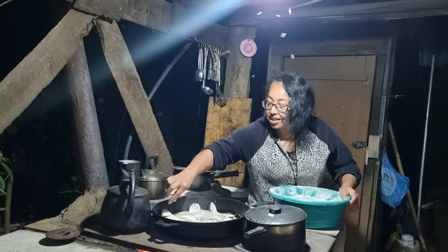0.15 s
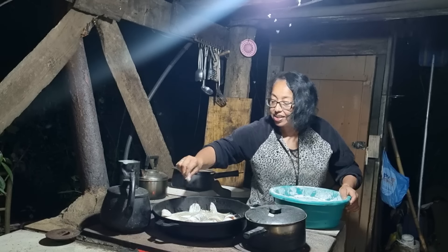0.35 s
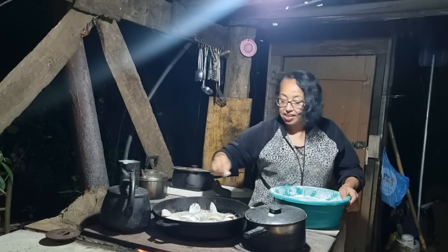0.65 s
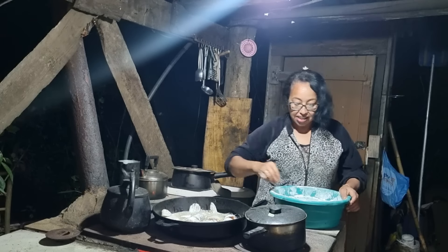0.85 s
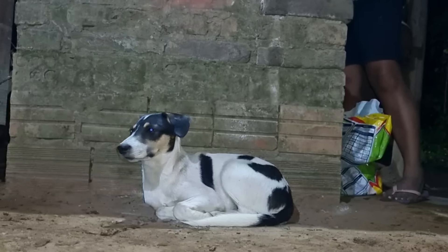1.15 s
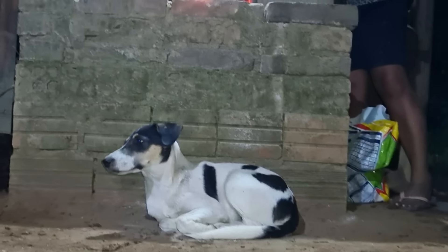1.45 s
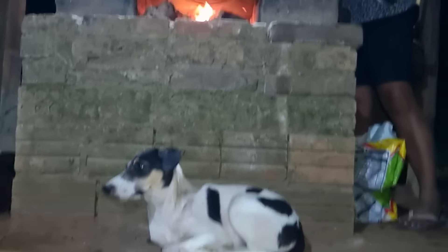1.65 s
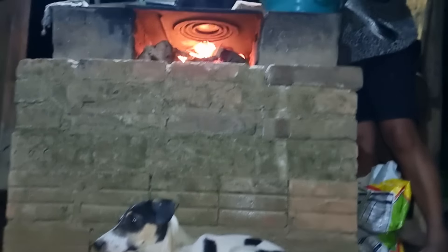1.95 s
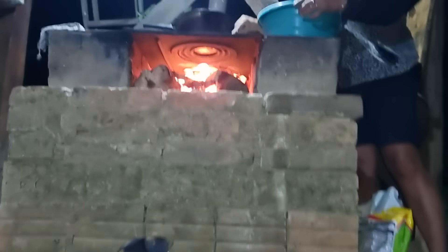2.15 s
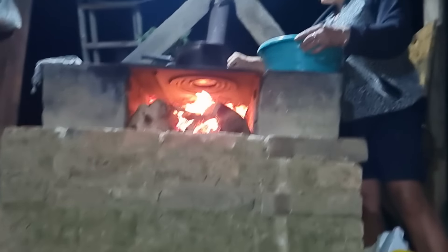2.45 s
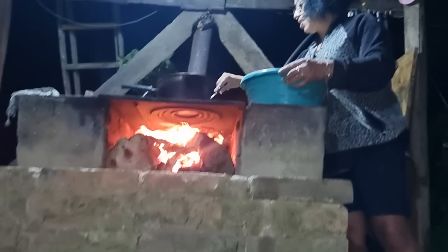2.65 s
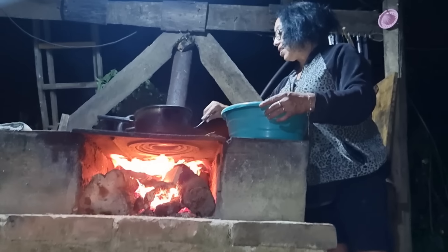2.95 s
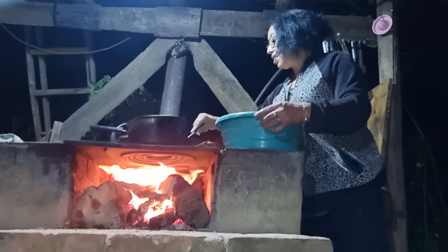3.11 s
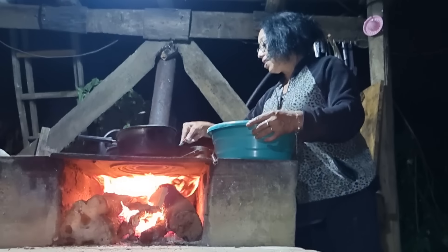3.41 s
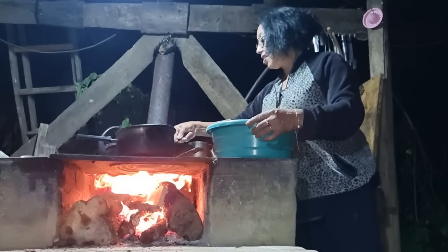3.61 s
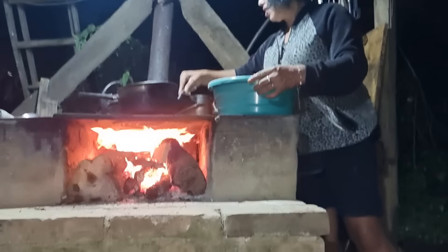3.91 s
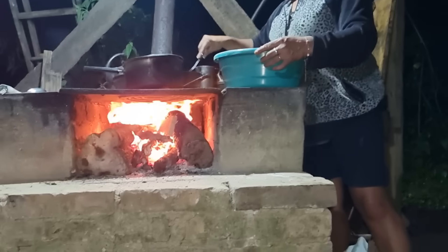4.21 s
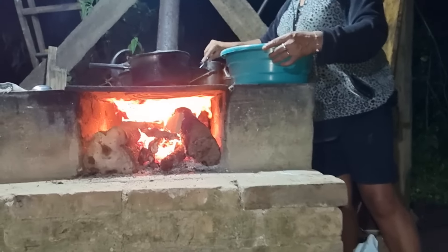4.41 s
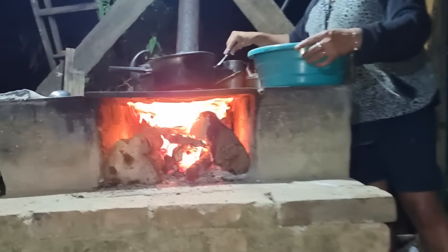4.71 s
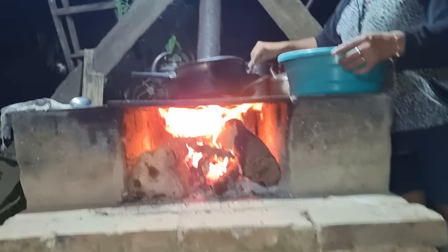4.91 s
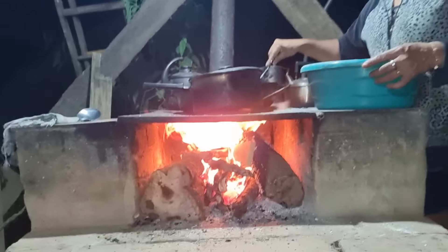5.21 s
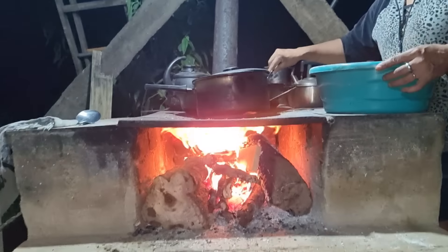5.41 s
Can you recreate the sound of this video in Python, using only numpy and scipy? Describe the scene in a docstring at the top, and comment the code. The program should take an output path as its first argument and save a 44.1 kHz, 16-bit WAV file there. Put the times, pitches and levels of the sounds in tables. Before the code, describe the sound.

A dense, high cricket chorus runs throughout this five and a half second night scene, heard through a hand-held stereo microphone in an open-air kitchen. At first a generator hums close by. At about 1 second, hum and crickets abruptly become quieter and continue that way. Frogs make short, dry clicks all along, the loudest just before 1 second. A wood fire ticks lightly, with clearer snaps around 1.3 and 3.4 seconds and a loud double pop at 5.2. The stove gives soft, dull thuds near 0.2, 1, 1.8 and 5.1 seconds. From 1.7 to 5 seconds, fingers tap and rub the microphone on the right, with the sharpest knocks at 2.7, 2.9 and 3.3. A lower cricket trills briefly around 4 seconds, then close crickets chirp on the right from 4.4. Underneath lie a low drone, distant insects and a faint river that swells slightly at the end.

```python
"""A chorus of crickets at night, each wing stroke a short high tone, heard from an open kitchen. Frogs click in
pulses through their throats, a generator hums, and a wood fire snaps in a stove that gives dull thuds. Behind
them lie a low drone and the night air: far insects, a river, rumble. For the first second the scene is near the
generator; then it changes to one by the stove, where fingers tap and rub the right microphone port of the hand-
held stereo recorder."""
import sys
import numpy as np
from scipy import signal
from scipy.fft import rfft, irfft, next_fast_len
from scipy.io import wavfile
from scipy.ndimage import uniform_filter1d

SR = 44100
rng = np.random.default_rng(int(sys.argv[2]) if len(sys.argv) > 2 else 0)


def unload_wav(signal):
    """Save mono or channel-first audio to the path in sys.argv[1] as 16-bit WAV at rate SR, clipped to [-1, 1]."""
    wavfile.write(
        sys.argv[1],
        SR,
        np.round(np.clip(np.atleast_2d(signal).T, -1, 1) * 32767).astype(np.int16),
    )


N = 245219
CHANGE_S, CHANGE_FADE_S = 0.97, 0.006  # the scene changes from the generator to the stove
STROKE_S, NEAR_CRICKETS_PAN_DB = .0049, -6  # pan is always left minus right

# Colour of the cricket chorus. Each row: frequency in Hz, gain in dB.
CHORUS_COLOUR = [(3900, -27), (4300, -17), (4600, -8), (4950, 1), (5250, -2), (5500, -4.5), (5850, -4.5),
                 (6050, -12), (6220, -27), (6600, -54)]
# The chorus from the stove, as the recorder swings. Each row: time in seconds, level in dB, pan in dB.
CHORUS_BY_STOVE = [(1.0, -44, -8), (2.2, -46, -1.5), (3.56, -45.5, -1), (3.7, -43.5, -3), (5.56, -41.5, -6)]
# Loud wing strokes of crickets close by, mostly in pairs. Each row: start in seconds, level in dB.
NEAR_STROKES = [(0.3566, -22.5), (3.4017, -31), (4.4308, -30.5), (4.5885, -29), (4.6458, -30),
                (4.7562, -26.5), (4.8075, -29), (4.9187, -29.5), (4.9841, -25), (5.0345, -30.5),
                (5.1417, -28), (5.1921, -28)]
# Frogs close to the microphone. Each row: start in seconds, level in dB, throat resonance in Hz.
NEAR_FROGS = [(0.819, -38, 3170), (0.94, -27.5, 3120), (1.172, -38, 2970), (1.4868, -40, 2960),
              (2.1952, -38, 3100), (2.515, -34.5, 2450), (2.7206, -34, 2650), (3.1188, -35.5, 2740),
              (3.3774, -39.5, 2800), (3.3974, -38, 2760), (3.7462, -37.5, 2400), (4.002, -41, 2370),
              (4.2275, -41, 3170), (4.6726, -37, 3120), (4.878, -35, 2950), (4.926, -40, 3220)]
# The generator's fundamental from the stove. Each row: time in seconds, level in dB.
HUM_BY_STOVE = [(1, -52), (2.4, -50), (3, -47), (3.6, -47), (4.2, -49), (5.3, -46)]
# Its overtones. Each row: multiple of the fundamental, level in dB close up, level in dB by the stove.
HUM_OVERTONES = [(2, -51, -64.5), (3, -66, -66), (6, -59, -78), (7, -54.5, -75.5), (8, -64.5, -75.5),
                 (9, -64.5, -85), (14, -62, -90)]
# Loudest snaps of the fire. Each row: start in seconds, level in dB, pan in dB.
FIRE_SNAPS = [(1.285, -36, 4), (1.9909, -41, 6), (3.4062, -32.5, 10), (3.4123, -36, 8), (4.4223, -40, 5),
              (4.4443, -40, 7), (5.1786, -38, -9), (5.2288, -22.5, 0), (5.2649, -28, 3)]
# Colour of a snap. Each row: frequency in Hz, gain in dB.
SNAP_COLOUR = [(1500, -38), (2500, -17), (5000, 4), (7500, -4), (11000, -5.5), (15600, 0)]
# Thuds from the stove. Each row: start in seconds, level in dB, pitch in Hz.
STOVE_THUDS = [(0.204, -32, 302), (0.925, -28.5, 170), (1.023, -34, 173), (1.844, -34.5, 160),
               (5.132, -38, 171)]
# Taps on the right port. Each row: time in seconds, level in dB, contact in ms, direction as +1 or -1.
FINGER_TAPS = [(1.805, -26, 3.1, 1), (2.127, -24.5, 1.8, 1), (2.1498, -16, 1.86, 1), (2.261, -28.5, 3.8, 1),
               (2.31, -33.5, 2.4, 1), (2.357, -24.5, 3, 1), (2.7094, -6, 0.53, -1), (2.7332, -13, 0.85, 1),
               (2.868, -27.5, 5.8, -1), (2.948, -13.5, 0.48, 1), (3.318, -15, 0.8, 1),
               (3.552, -30, 0.88, 1), (4.986, -21, 11.6, 1)]
# Ring of the recorder's case. Each row: pitch in Hz, dB relative to the tap, seconds to fall 60 dB.
CASE_MODES = [(115, -9, .045), (200, -14, .03)]
# Rubs on the right port. Each row: start in seconds, length in seconds, level in dB.
FINGER_RUBS = [(1.71, .03, -31), (2.115, 0.056, -36.5), (2.2, 0.43, -46), (2.703, 0.047, -30),
               (2.819, 0.31, -44), (2.975, 0.036, -39), (3.318, 0.029, -39.5), (3.452, .25, -44.5),
               (3.654, .13, -41), (4.401, 0.082, -45), (4.485, 0.059, -33.5), (4.633, 0.029, -35.5),
               (4.935, 0.055, -36)]
# Swell of the low drone. Each row: time in seconds, level in dB.
DRONE_LEVEL = [(0, -56), (1, -53.5), (1.95, -54.5), (3.1, -63), (4.6, -58), (5.1, -53.5), (5.56, -52.5)]
# Night air by the stove. Each row: frequency in Hz, left level in dB per Hz, right minus left in dB,
# extra dB near the generator.
NIGHT_AIR = [(30, -91, 5, 2), (60.4, -71, 4.5, -5), (101, -75, 1, 13), (170, -84, -2, 3.5),
             (300, -88, 1, 4), (460, -96, 3.5, 12.5), (620, -99, 6.5, 10.5), (750, -105, 6.5, 15.5),
             (950, -98.5, 6.5, 11), (1630, -94.5, 3.5, 7.5), (2300, -85.5, 0, 5.5), (4040, -87.5, 2, 9.5),
             (6470, -94, -0.5, 11), (7170, -91.5, 1, 9), (8040, -87, 4, 7), (8730, -92, 6, 8),
             (9430, -100, 3, 11.5), (11300, -105, -2, 13.5), (15300, -106, 1, 11.5)]
# How alike the air is at the two microphones. Each row: frequency in Hz, likeness from 0 to 1.
AIR_LIKENESS = [(60, 1), (450, 0.79), (1200, 0.12), (3000, 0.014)]
# Swell of the river from the stove. Each row: time in seconds, gain in dB around 800 Hz.
RIVER_SWELL = [(1, -6), (1.5, -3), (1.9, 1.5), (4.2, 1), (5.3, 2), (5.56, 6.5)]
# Treble dip of the right microphone port. Each row: frequency in Hz, gain in dB.
RIGHT_PORT_DIP = [(6200, 0), (7000, -6), (7500, -13), (8000, -26), (8600, -33), (9300, -24), (10000, -15),
                  (12000, -8), (15500, -8)]
# Cut of the lowest bass. Each row: frequency in Hz, gain in dB.
BASS_CUT = [(15, -9), (30, -5), (42, 0)]


def cricket_chorus(strokes_per_s=60, spread_db=2.5, blur=.55, patchy_db=1.46):
    """Crickets all around, each at its own pitch, over the blur of far ones; groups swell and fade."""
    near = np.zeros((2, N))
    for hz in np.linspace(4200, 6300, 24):
        onsets = rng.random((2, N)) < strokes_per_s / SR
        strength = gain_of(spread_db * np.minimum(rng.exponential(1, (2, N)), 3.5))
        near += signal.oaconvolve(onsets * strength, wing_stroke(hz, STROKE_S)[None], axes=1)[:, :N]
    far = coloured(rng.standard_normal((2, N)), [(3800, -30), (3900, 0), (6500, 0), (6700, -30)])
    song = coloured((1 - blur) * unit_rms(near) + blur * unit_rms(far), CHORUS_COLOUR)
    spectrum = signal.stft(song, SR, nperseg=256)[2]
    spectrum *= gain_of(patchy_db * patches(spectrum.shape[1:], bins=4, frames=22))
    song = unit_rms(signal.istft(spectrum, SR, nperseg=256)[1][:, :N])
    t = np.arange(N) / SR
    db = by_place(t, at_generator=-34.5, at_stove=at_time(CHORUS_BY_STOVE, t))
    pan_db = by_place(t, at_generator=-3.2, at_stove=at_time(CHORUS_BY_STOVE, t, column=2))
    return np.sqrt(2) * gain_of(db) * panned(song, pan_db)


def wing_stroke(hz, length_s, sag=0.038):
    """One stroke of a cricket's wing: a short tone whose pitch sags a little."""
    t = np.arange(0, length_s, 1 / SR)
    pitch_hz = hz * (1 + sag * (.5 - t / length_s))
    return np.sin(np.pi * t / length_s) * np.sin(2 * np.pi * np.cumsum(pitch_hz) / SR)


def near_crickets(hz=4920):
    """Loud wing strokes of crickets close by on the right, standing out of the chorus."""
    out = np.zeros(N)
    for start, db in NEAR_STROKES:
        add(out, start, gain_of(db) * wing_stroke(hz, STROKE_S))
    return panned(out, NEAR_CRICKETS_PAN_DB)


def cricket_trill(start=3.82, length_s=.5, hz=4480, strokes_per_s=75, db=-47, jitter=.3, spread_db=1.5):
    """A lower cricket joins for a moment: a run of uneven wing strokes that swells and fades."""
    out = np.zeros(N)
    offsets = np.arange(0, length_s, 1 / strokes_per_s)
    for offset, swell in zip(offsets, signal.windows.tukey(len(offsets), .4)):
        late, loud = rng.standard_normal(2)
        stroke = swell * gain_of(db + spread_db * loud) * wing_stroke(hz, 2 * STROKE_S)
        add(out, start + offset + jitter * late / strokes_per_s, stroke)
    return panned(out, NEAR_CRICKETS_PAN_DB)


def frog_click(hz, decay_s, half_band_hz=350, pulses_per_s=350, click_db=-9):
    """A burst of uneven pulses through a throat resonance, with a wider click on top."""
    t = np.arange(4400) / SR
    pulses = rng.standard_normal((2, len(t))) * (0.35 + np.cos(np.pi * pulses_per_s * t) ** 2)
    pulses[1] = 0.47 * pulses[0] + 1.1 * pulses[1]  # partly alike at the two microphones
    envelope = (1 - np.exp(-t / 0.00094)) * (np.exp(-t / decay_s) + 0.14 * np.exp(-t / 0.025))
    burst = pulses * envelope
    throat = signal.butter(2, [hz - half_band_hz, hz + half_band_hz], "band", fs=SR, output="sos")
    wide = signal.butter(2, [2000, 4600], "band", fs=SR, output="sos")
    return 2.3 * (signal.sosfilt(throat, burst) + gain_of(click_db) * signal.sosfilt(wide, burst))


def frogs(far_db=-51, spread_db=6.5):
    """Near frogs click straight ahead, far ones at random from either side."""
    out = np.zeros((2, N))
    for start, db, hz in NEAR_FROGS:
        add(out, start, panned(gain_of(db) * frog_click(hz, decay_s=0.013), pan_db=-0.5))
    for when, pitch, loud, side in rng.random(size=(55, 4)):
        call = gain_of(far_db + spread_db * loud) * frog_click(2300 + 900 * pitch, decay_s=0.012)
        add(out, when * N / SR, panned(call, pan_db=6 * (side - .5)))
    return out


def generator(hz=58.5, close_db=-41, right_lag_rad=0.64, waver_db=1.5):
    """A hum with overtones, close up and then farther off; the fundamental wavers apart on each side."""
    t = np.arange(N) / SR
    phase = 2 * np.pi * hz * t - np.array([[0], [right_lag_rad]])
    waver = unit_rms(uniform_filter1d(uniform_filter1d(rng.standard_normal((2, N)), 2500), 2500))
    tone = gain_of(by_place(t, close_db, at_time(HUM_BY_STOVE, t)) + waver_db * waver) * np.sin(phase)
    for multiple, near_db, far_db in HUM_OVERTONES:
        overtone = np.sin(round(multiple) * phase + 2 * np.pi * rng.random())
        tone += gain_of(by_place(t, near_db, far_db)) * overtone
    return panned(np.sqrt(2) * tone, pan_db=-2.0)


def wood_fire(small_db=-64, tail_db=-20):
    """Burning wood snaps: a click, a 1 ms burst and a faint tail; small snaps come at random."""
    t, out = np.arange(1800) / SR, np.zeros((2, N))
    click = 2.5 * (t == 0)
    decay = np.exp(-t / 0.00083) + gain_of(tail_db) * np.exp(-t / 0.014)
    envelope = np.minimum(t / 0.00021, 1) * decay
    small = [(when * N / SR, small_db + 12 * loud, 0) for when, loud in rng.random(size=(100, 2))]
    for start, db, pan_db in list(FIRE_SNAPS) + small:
        snap = click + rng.standard_normal(len(t)) * envelope
        add(out, start, panned(gain_of(db) * snap, pan_db))
    return coloured(out, SNAP_COLOUR)


def stove_thuds(t60=0.058):
    """Low, soft knocks from the stove that reach both microphones."""
    t, out = np.arange(0, .15, 1 / SR), np.zeros(N)
    attack = 1 - np.exp(-t / 0.0018)
    for start, db, hz in STOVE_THUDS:
        add(out, start, attack * gain_of(db - 60 * t / t60) * np.sin(2 * np.pi * hz * t))
    return panned(out, pan_db=-1.4)


def finger_taps(rise=0.44, fall=0.26, crack_hz=2800, crack_s=.00015):
    """A finger pushes the port, which springs back and rings the case; short, hard taps crack."""
    t, out = np.arange(-700, 5000) / SR, np.zeros(N)  # the push peaks at t = 0
    modes = sum(np.sin(2 * np.pi * hz * t + 0.24) * gain_of(db - 60 * t / t60)
                for hz, db, t60 in CASE_MODES)
    for when, db, contact_ms, direction in FINGER_TAPS:
        width_ms = contact_ms * np.where(t < 0, rise, fall)
        push = np.exp(-abs(1000 * t / width_ms) ** 1.7)
        ring = (t > 0) * (1 - push) * modes
        crack = .07 / contact_ms * np.sin(2 * np.pi * crack_hz * t) * np.exp(-(t / crack_s) ** 2)
        add(out, when + t[0], np.sign(direction) * gain_of(db) * (push - ring + crack))
    return out


def finger_rubs(slow_s=.2, clump_db=2.5):
    """A finger slides over the port and makes clumped noise; long, slow rubs are duller."""
    out = np.zeros(N)
    for start, length_s, db in FINGER_RUBS:
        db_per_octave = -11 if length_s > slow_s else -5.5
        colour = [(35, -20), (80, 0), (80 * 2 ** 6, 6 * db_per_octave), (16000, 6 * db_per_octave - 22)]
        grit, unevenness = rng.standard_normal((2, 24000))
        clumps = gain_of(clump_db * unit_rms(uniform_filter1d(unevenness, 80)))
        rub = unit_rms(coloured(grit * clumps, colour))[:round(length_s * SR)]
        add(out, start, gain_of(db) * rub * signal.windows.tukey(len(rub), .9))
    return out


def handling(leak_db=-30):
    """Fingers right on the right port; little of it leaks to the left microphone."""
    return (finger_taps() + finger_rubs()) * gain_of([[leak_db], [0]])


def low_drone(hz=178, half_band_hz=22):
    """Noise in one low resonance, off to the right, nearly the same wave at both microphones."""
    noise = rng.standard_normal((2, N))
    band = [(hz + step * half_band_hz, db) for step, db in [(-3, -30), (-1, -3), (1, -3), (3, -30)]]
    drone = unit_rms(coloured(noise[0] + 0.35 * noise, band))
    return panned(gain_of(at_time(DRONE_LEVEL, np.arange(N) / SR)) * drone, pan_db=-6.0)


def night_air(patchy_db=1.5, bass_patchy_db=1.0, flicker_db=1.34):
    """Far insects, river and rumble: noise with drifting patches, lumpier in the bass."""
    hz, t, (left, other) = signal.stft(rng.standard_normal((2, N)), SR, nperseg=1024, noverlap=768)
    hz = hz[:, None]
    likeness = np.clip(at_hz(AIR_LIKENESS, hz), 0, 1)
    right = gain_of(at_hz(NIGHT_AIR, hz, column=2)) * (likeness * left + np.sqrt(1 - likeness ** 2) * other)
    depth_db = patchy_db + bass_patchy_db / (1 + (hz / 500) ** 2)
    drift_db = depth_db * patches(left.shape, bins=10, frames=10)
    flicker = unit_rms(uniform_filter1d(rng.standard_normal(len(t)), 4))
    river_db = np.exp(-np.log((hz + 1) / 800) ** 2) * at_time(RIVER_SWELL, t)
    db = at_hz(NIGHT_AIR, hz) + by_place(t, at_hz(NIGHT_AIR, hz, column=3), river_db)
    spectrum = np.array([left, right]) * gain_of(db + drift_db + flicker_db * flicker)
    return np.sqrt(SR / 2) * signal.istft(spectrum, SR, nperseg=1024, noverlap=768)[1][:, :N]


def by_place(t, at_generator, at_stove):
    """Fades quickly from one value to the other as the scene changes."""
    before = np.clip((CHANGE_S - t) / CHANGE_FADE_S + .5, 0, 1)
    return before * at_generator + (1 - before) * at_stove


def patches(shape, bins, frames):
    """Random swells, smoothed over frequency and time."""
    across_hz = uniform_filter1d(rng.standard_normal(shape), bins, axis=0)
    return unit_rms(uniform_filter1d(across_hz, frames, axis=1))


def gain_of(db):
    return 10 ** (np.asarray(db) / 20)


def unit_rms(x):
    return x / np.sqrt(np.mean(x ** 2) + 1e-20)


def at_time(table, t, column=1):
    columns = np.transpose(table)
    return np.interp(t, columns[0], columns[column])


def at_hz(table, hz, column=1):
    columns = np.transpose(table)
    return np.interp(np.log(hz + 1), np.log(columns[0] + 1), columns[column])


def add(mix, start, sound):
    part = mix[..., round(start * SR):][..., :sound.shape[-1]]
    part += sound[..., :part.shape[-1]]


def panned(sound, pan_db):
    return sound * gain_of(np.array([pan_db / 2, -pan_db / 2]).reshape(2, -1))


def coloured(x, curve):
    """Filters by a curve of frequency in Hz and gain in dB."""
    size = next_fast_len(x.shape[-1])
    response = gain_of(at_hz(curve, np.fft.rfftfreq(size, 1 / SR)))
    return irfft(rfft(x, size) * response, size)[..., :x.shape[-1]]


def scene():
    """All that reaches the two microphones."""
    outdoors = night_air() + low_drone() + cricket_chorus() + near_crickets() + frogs() + generator()
    return outdoors + wood_fire() + handling() + stove_thuds() + cricket_trill()


def record(dry, treble_edge_hz=15780):
    """The right port has a deep treble dip; the lowest bass is cut, and the treble ends near 15.8 kHz."""
    ports = np.array([dry[0], coloured(dry[1], RIGHT_PORT_DIP)])
    low_pass = signal.firwin(1023, treble_edge_hz, window=("kaiser", 9), fs=SR)
    return signal.oaconvolve(coloured(ports, BASS_CUT), low_pass[None], "same")


dry = scene()
out = record(dry)
unload_wav(out)
```